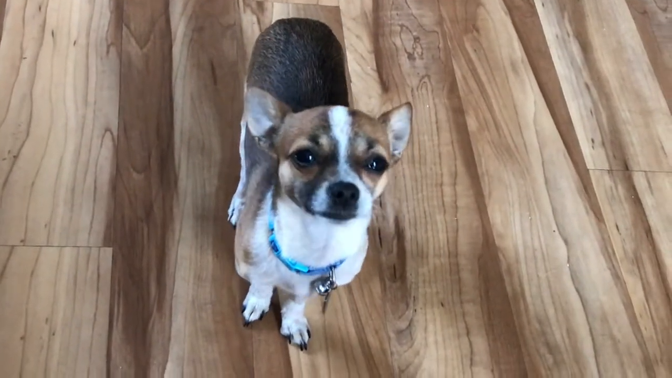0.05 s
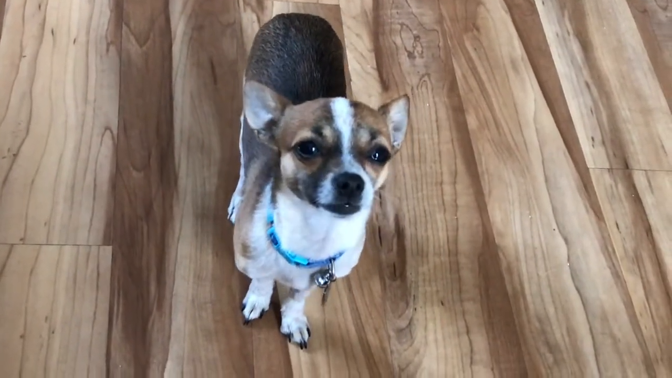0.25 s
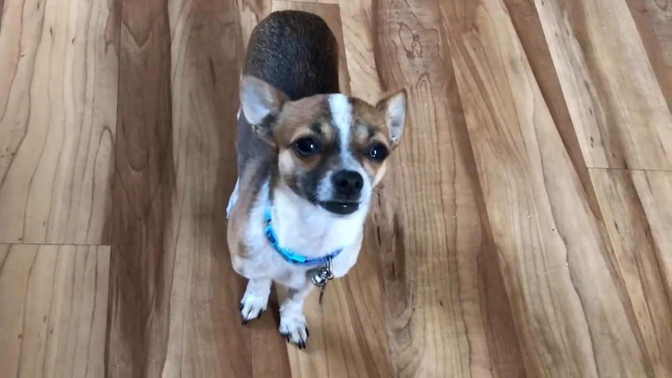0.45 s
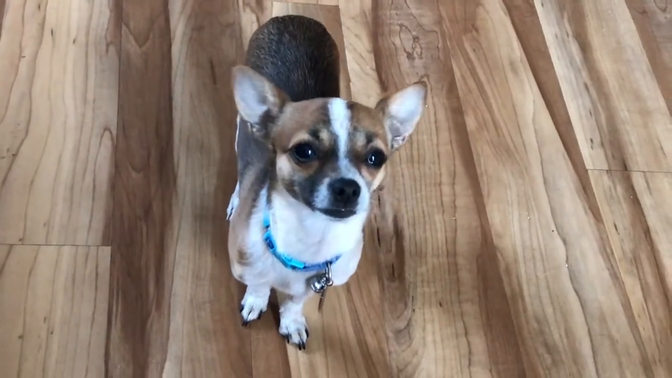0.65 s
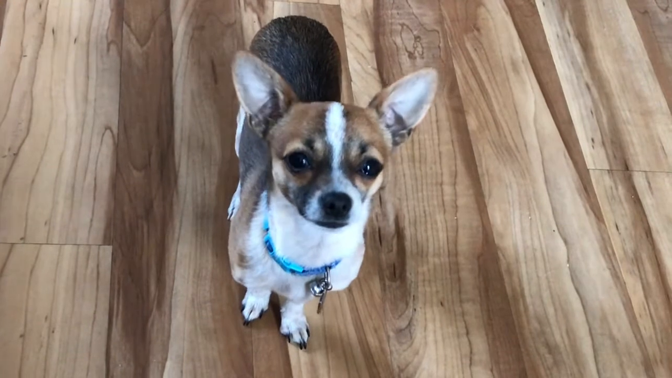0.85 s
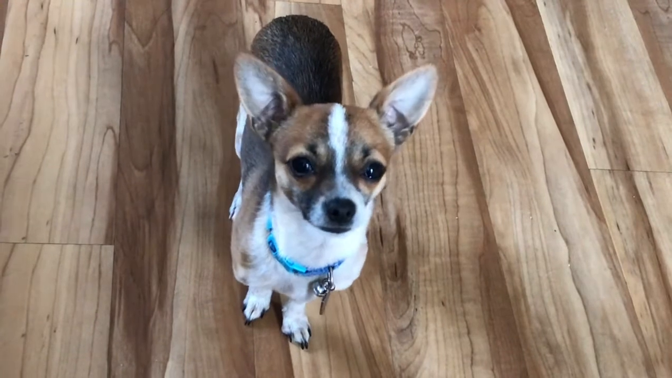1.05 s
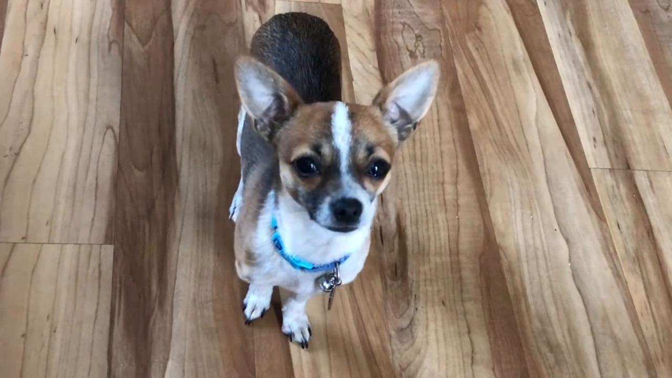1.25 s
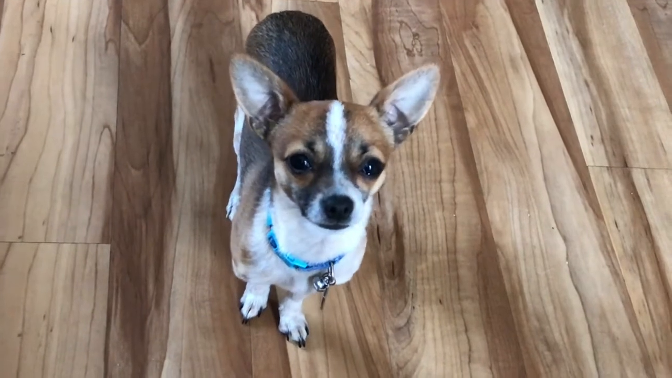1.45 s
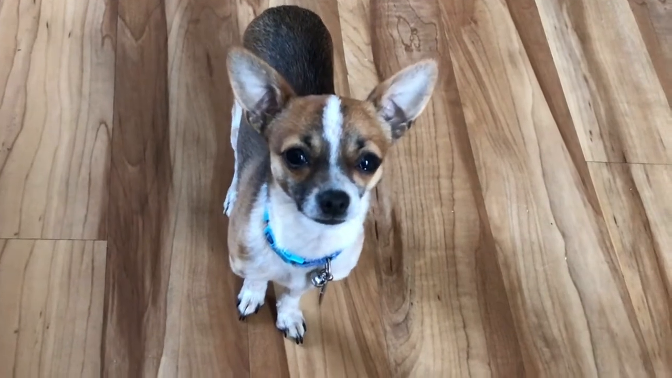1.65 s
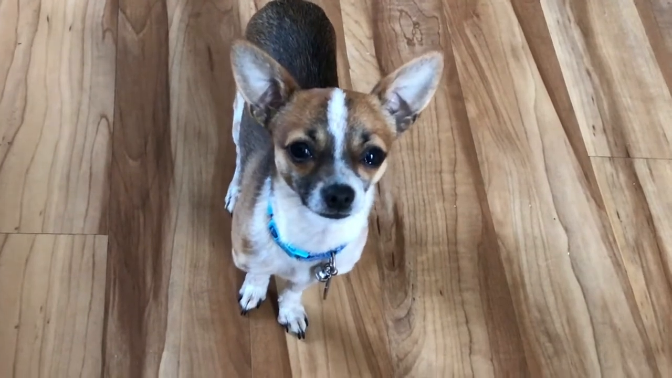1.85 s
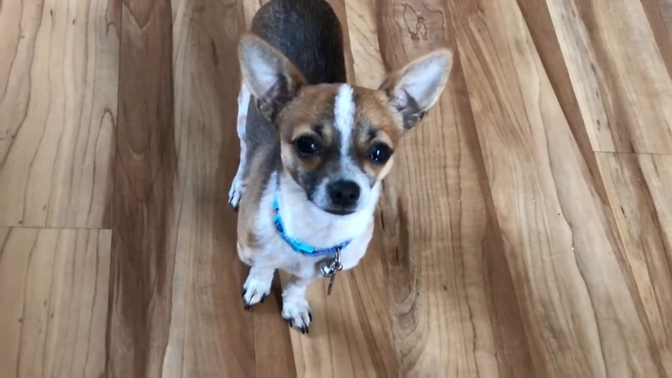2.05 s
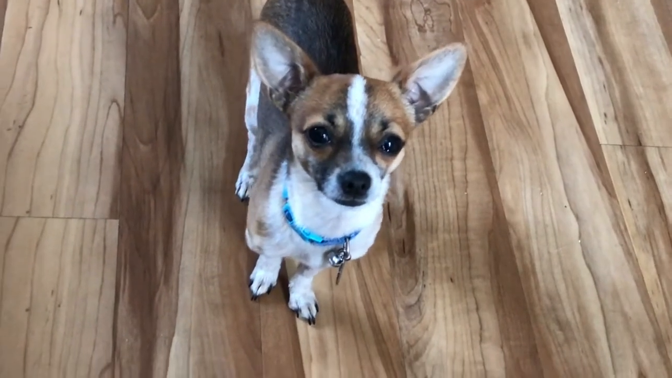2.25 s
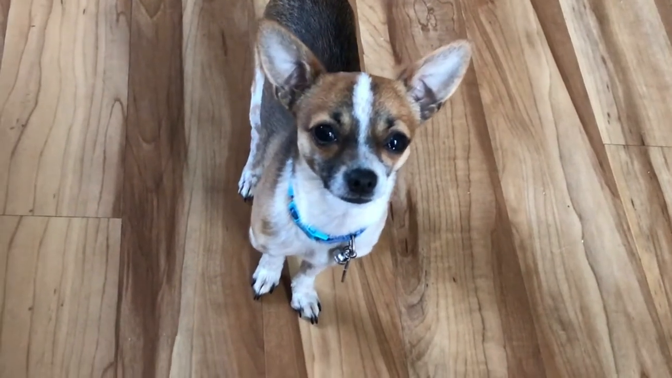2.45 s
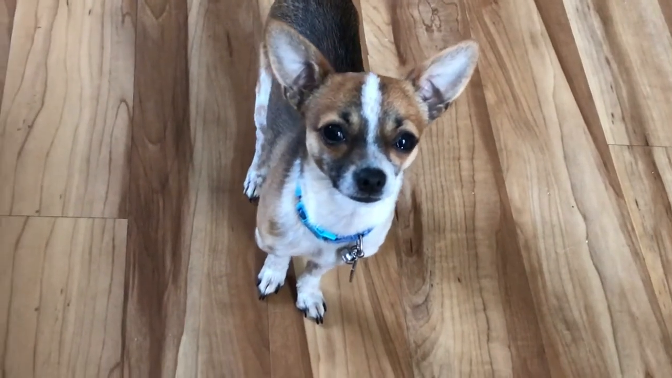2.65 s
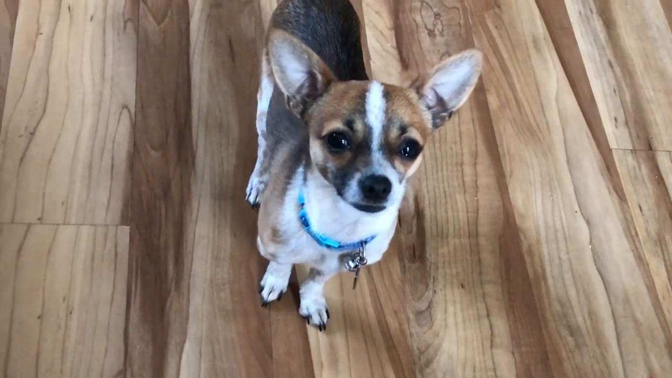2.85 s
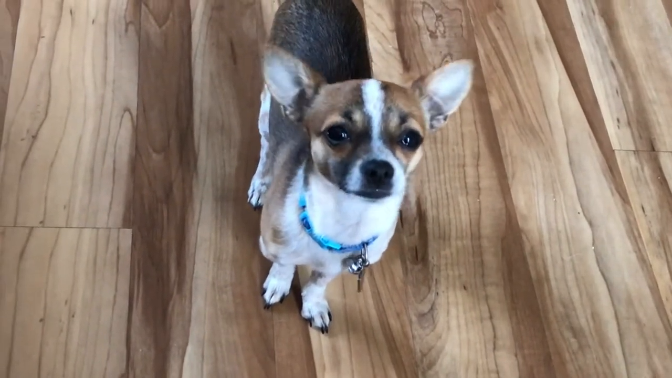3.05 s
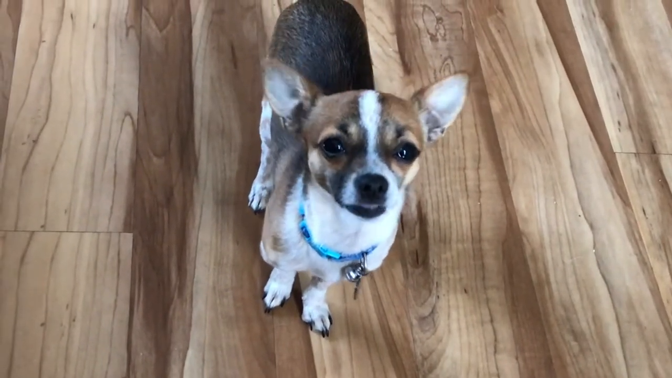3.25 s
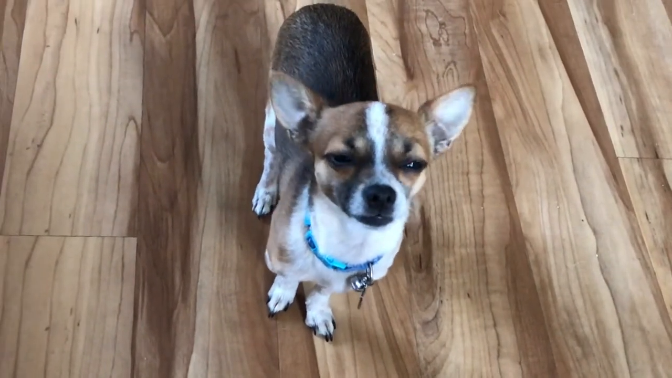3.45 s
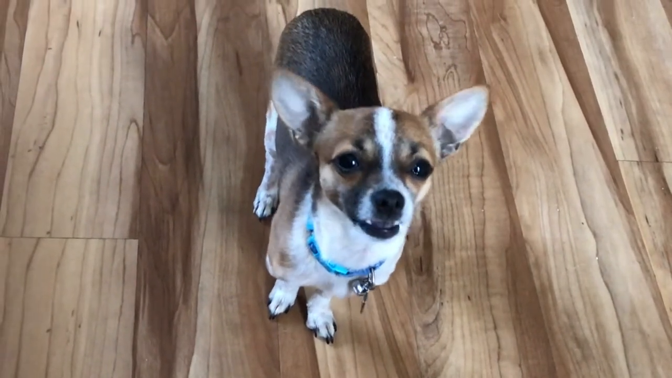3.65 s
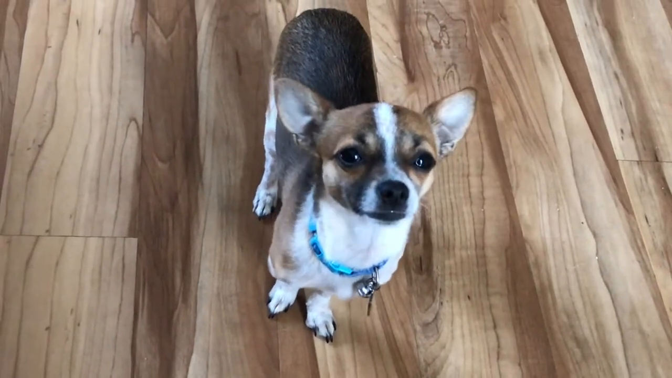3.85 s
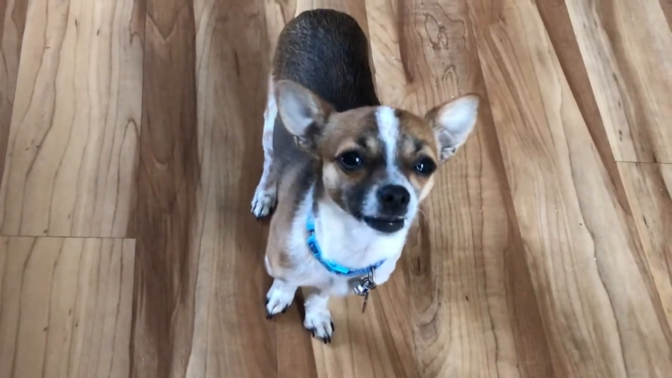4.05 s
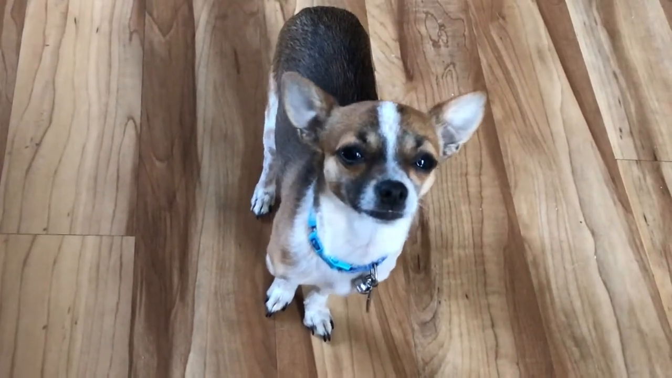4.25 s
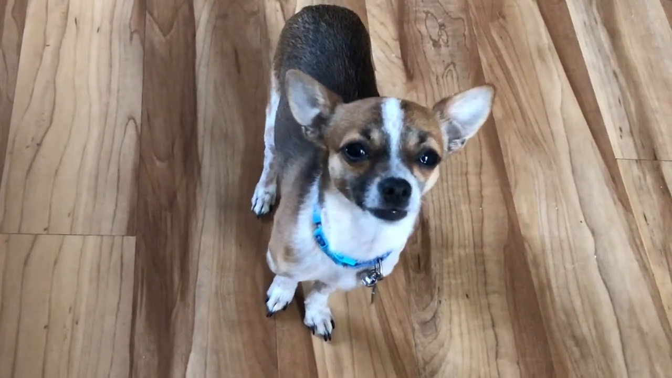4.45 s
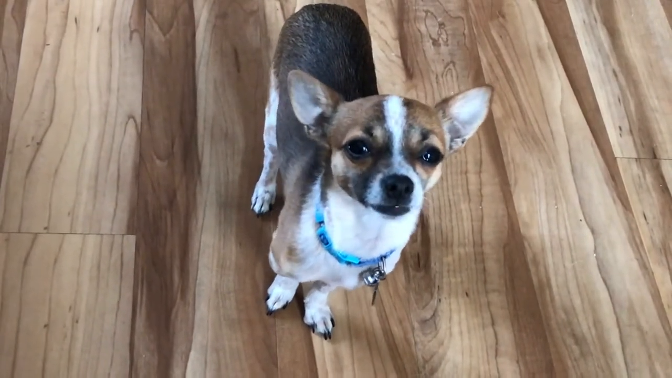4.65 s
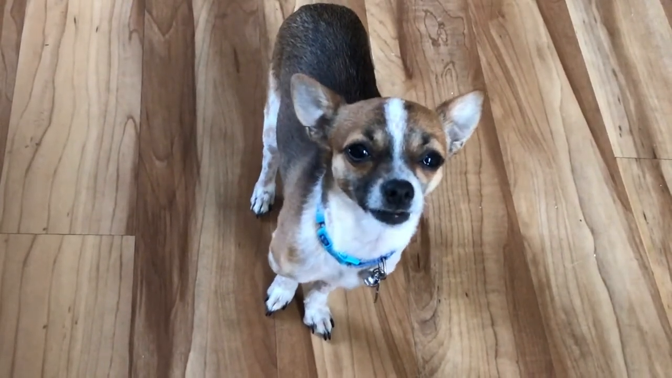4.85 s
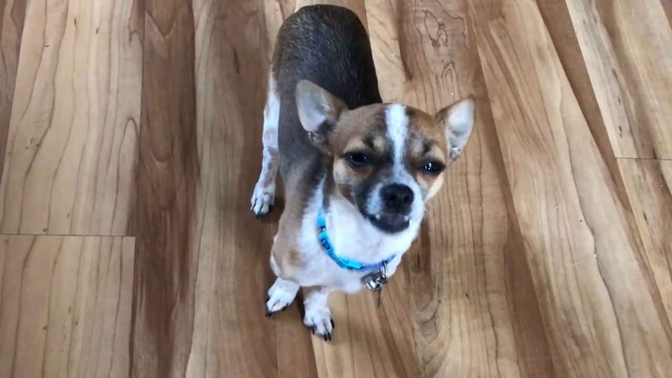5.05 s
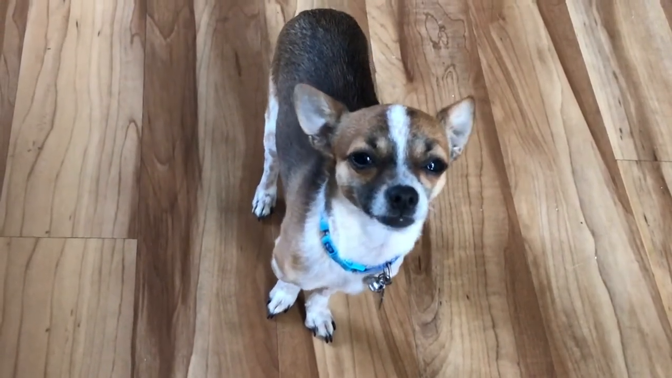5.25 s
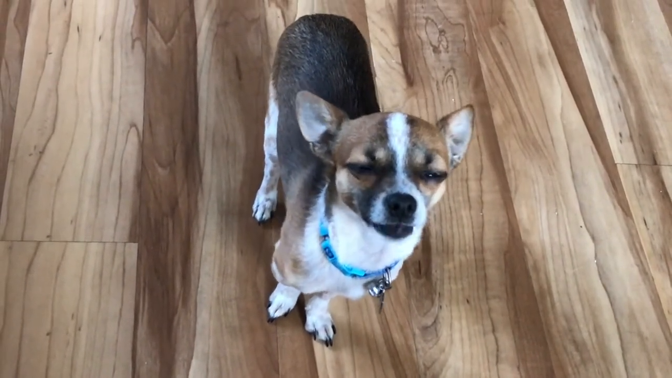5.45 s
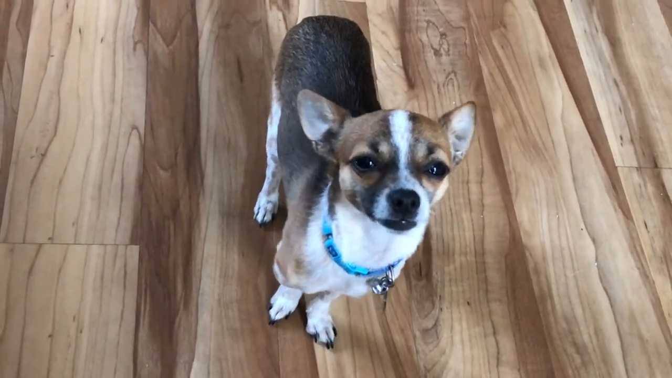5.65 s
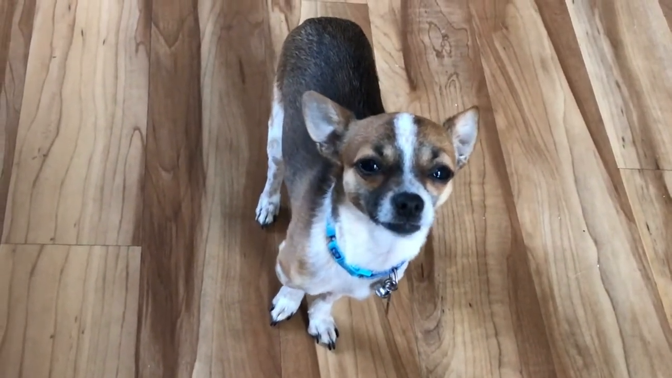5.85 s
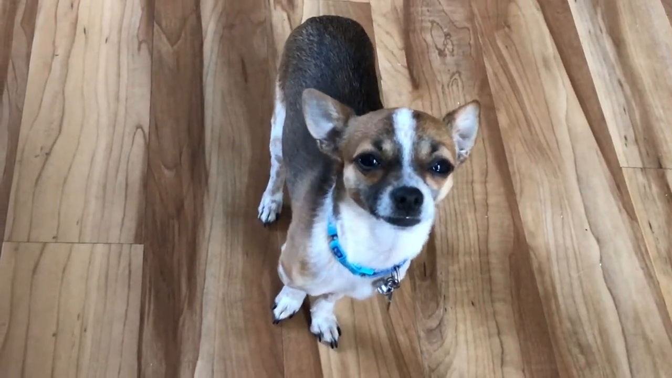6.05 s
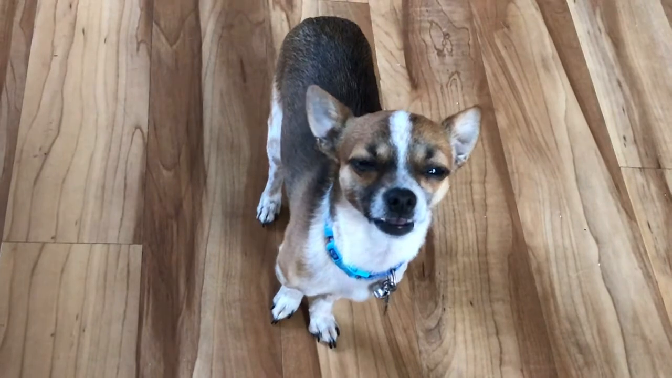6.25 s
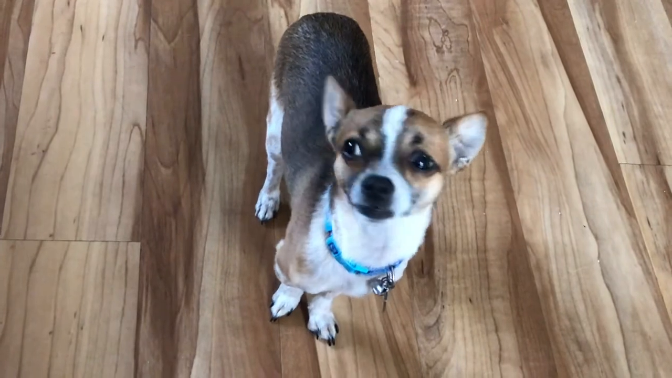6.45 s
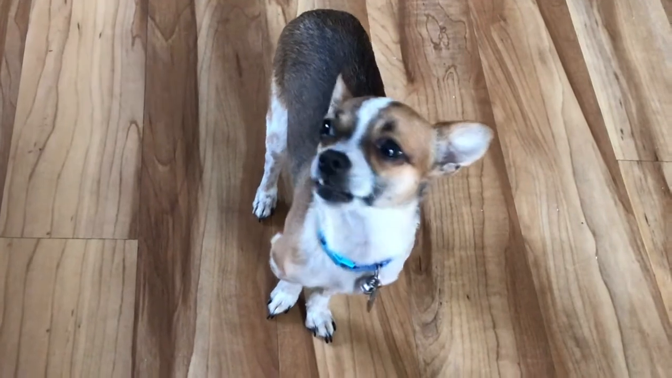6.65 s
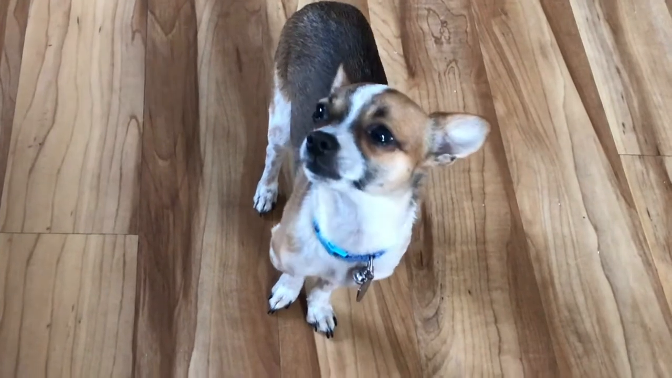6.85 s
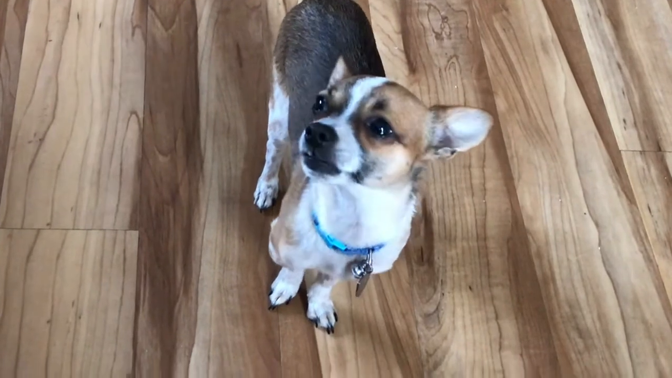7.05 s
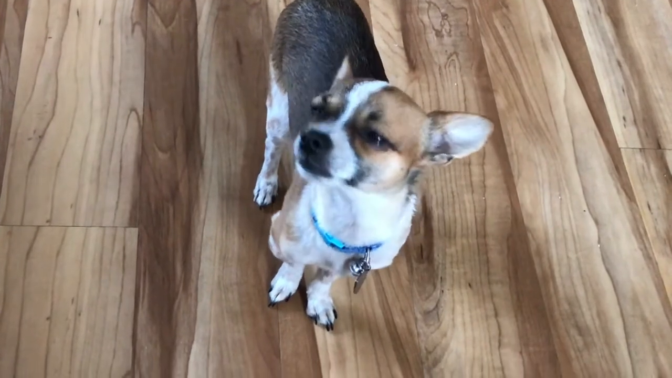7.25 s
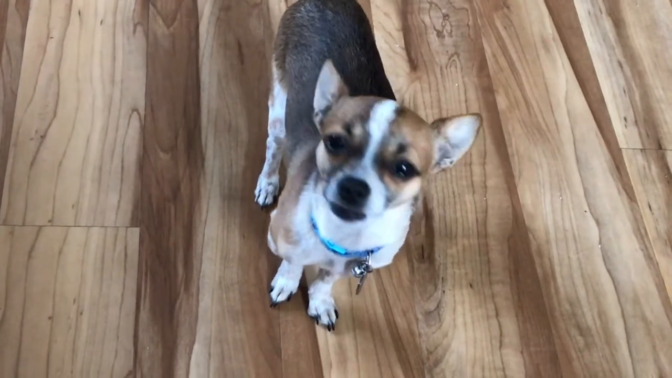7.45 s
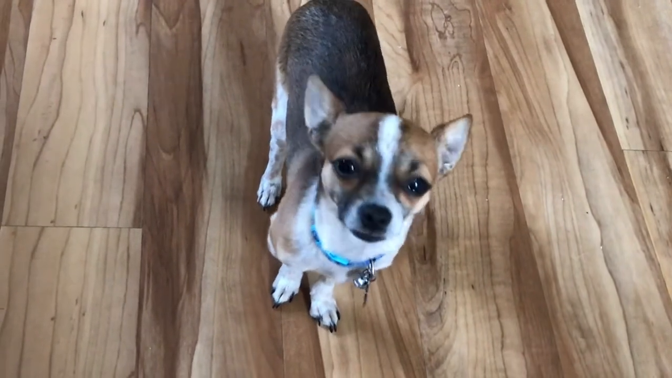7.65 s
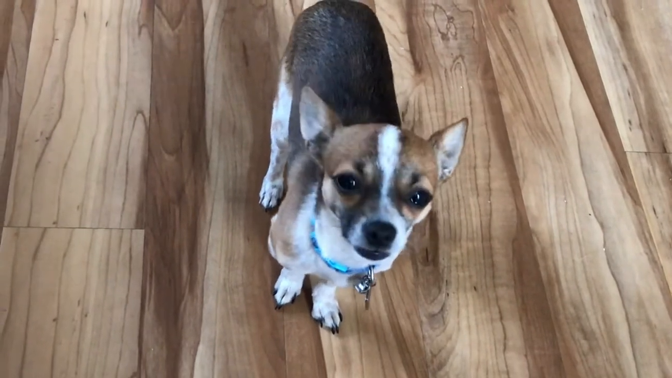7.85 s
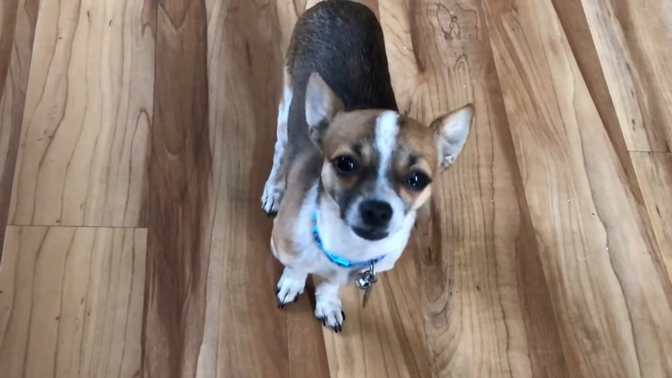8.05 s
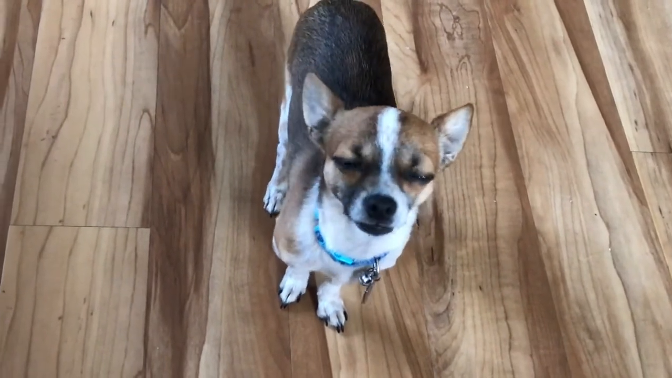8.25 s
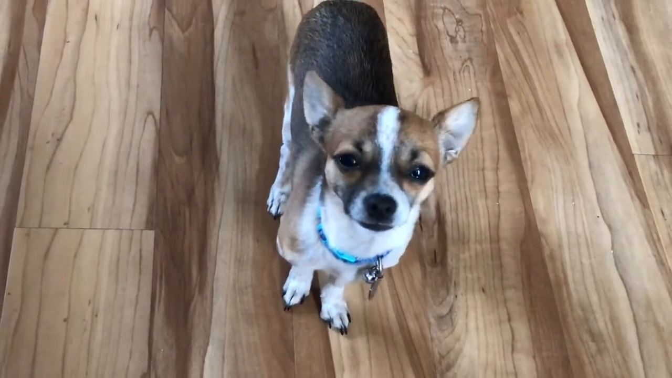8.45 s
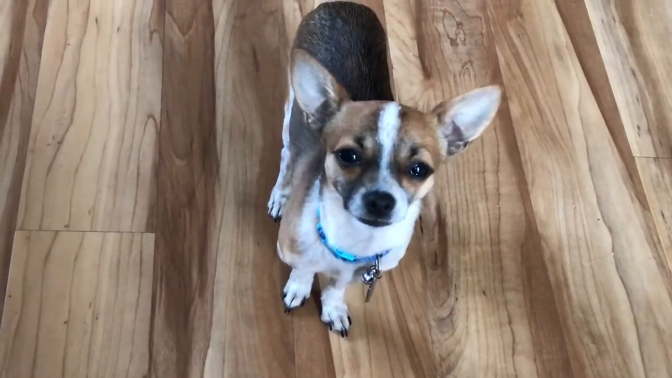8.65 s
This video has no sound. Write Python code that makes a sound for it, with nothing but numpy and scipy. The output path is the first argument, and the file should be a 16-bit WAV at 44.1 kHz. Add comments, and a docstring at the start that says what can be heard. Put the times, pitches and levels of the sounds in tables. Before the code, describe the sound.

A small dog near the microphone grumbles softly through closed lips, the pulses slowing to a creak, just after a yip has rung out. Quiet hum and a thin whine fill the room. Around three seconds a strained, cracking yip starts a regular series of very short, bright yips, each ringing off bare walls, with airy gasps between. Later ones get weaker, ending in tiny squeaks, breaths and light ticks.

```python
"""The ring of a yip just ended hangs in a quiet, hard-walled room, over a low household hum and thin whine.
A small dog on a wooden floor, close to a phone microphone, grumbles with its mouth shut, then yips in
a quick run, gasping between calls; small ticks and soft floor thumps fall among them.
Yips are sums of gliding partials with leaking air, the grumble is pulses through throat resonances,
gasps are shaped noise, ticks and thumps are decaying tones, and the house is noise plus unsteady tones."""
import sys
import numpy as np
from scipy import signal
from scipy.fft import rfft, irfft, next_fast_len
from scipy.io import wavfile
from scipy.ndimage import uniform_filter1d, minimum_filter1d, map_coordinates

SR = 44100
rng = np.random.default_rng(int(sys.argv[2]) if len(sys.argv) > 2 else 0)


def put_to_file(sound):
    """Save the sound as 16-bit audio at rate SR, in the file named by the first command-line argument."""
    columns = np.atleast_2d(sound).T  # one column per channel
    safe = np.clip(columns, -1, 1)
    whole_steps = np.round(safe * 32767)
    wavfile.write(sys.argv[1], SR, whole_steps.astype(np.int16))


N = 384111

# Every call and whimper, the first just ended at time zero:
# (start [s], length [s], onset pitch [Hz], lowest pitch [Hz], top pitch [Hz],
#  middle of the climb [share of call], length of the climb [share of call],
#  first partial [dB], swell over the call [dB], arch of mid-call over both ends [dB],
#  mouth widest [share of call], then with the mouth widest: partials 2, 3, 4 [dB each],
#  higher partials [dB], leaking air [dB])
CALLS = [(-.07, .065, 1401, 1296, 1601, 0.43, .25, -12, 2.5, -1, 0.43, -26.5, -25, -35.5, -40, -36.5),
         (2.946, .078, 1142, 1164, 1547, 0.098, .08, -9, -5, 6, 0.43, -22.5, -27, -31.5, -40, -32.5),
         (3.199, .079, 1369, 1363, 1413, .35, .1, -12, -2, 11, .6, -30.5, -36.5, -44, -41.5, -53),
         (3.714, .063, 1427, 1149, 1557, 0.54, .11, -14.5, -2, -0.5, 0.39, -28, -28, -34, -43, -41.5),
         (4.146, 0.058, 1417, 1143, 1509, 0.61, .08, -15, 0, -0.5, 0.44, -30, -28, -32, -46, -43),
         (4.553, .061, 1344, 1160, 1386, 0.39, .15, -14, -7, 3, .35, -31, -35, -52.5, -46, -44.5),
         (4.981, .07, 1258, 1269, 1594, .12, .2, -7.5, -6, 7, 0.52, -20.5, -23.5, -34, -35.5, -39.5),
         (5.415, 0.054, 1419, 1254, 1539, .55, .15, -14, -1, 0.5, 0.41, -31.5, -28.5, -33.5, -41, -41.5),
         (5.812, .048, 1324, 1197, 1447, 0.5, .2, -12.5, -3.5, 2, 0.5, -32.5, -26.5, -38.5, -42, -40),
         (6.263, .034, 1397, 1260, 1311, 0.54, 0.074, -12, -4.5, 3.5, 0.34, -33.5, -33.5, -55, -47, -48.5),
         (6.659, 0.03, 1486, 1424, 1459, 0.7, .1, -18, -4.5, 2.5, 0.52, -36.5, -39, -57, -47.5, -48),
         (7.13, 0.03, 970, 930, 978, 0.53, .1, -38, -6, 4.5, 0.23, -53.5, -67.5, -67.5, -77, -74.5),
         (7.545, .057, 1258, 1168, 1238, .6, .2, -14, -8.5, 4.5, 0.42, -37.5, -33.5, -40.5, -52.5, -58.5),
         (7.754, 0.016, 1517, 1427, 1570, .8, .1, -41.5, -7.5, 1.5, .5, -76, -69, -81, -84, -85),
         (7.787, .05, 910, 935, 976, 0.32, .2, -72, 1, 9, 0.61, -60, -84, -80, -88, -82.5),
         (7.865, .036, 1309, 1279, 1355, 0.677, .2, -23.5, -1.5, -0.5, 0.73, -45, -45.5, -63, -67, -62.5),
         (7.925, 0.031, 930, 922, 972, .3, .1, -51.5, 2, 1.5, 1, -61.5, -78, -72, -86, -79.5),
         (8.21, 0.0088, 805, 805, 844, 0.37, .2, -38, -21, 1, 0.27, -67, -68, -86.5, -79, -87),
         (8.212, .028, 1216, 1227, 1273, 0.37, .1, -32, -3, 4, .4, -63.5, -69.5, -78, -70, -72)]
# Colour the open mouth gives higher partials and air: (frequency [Hz], level [dB])
MOUTH_COLOUR = [(1000, 3.5), (4500, 6.5), (5700, -6), (6400, -16.5), (7100, -8), (8500, -11.5),
                (10000, -17), (12500, -15), (16000, -18.5)]
# Extra lines of a broken voice: (frequency [fifths of the pitch], level against partial 1 [dB])
BROKEN_LINES = [(2, -21), (3, -31.5), (6, -11.5), (12, -20.5), (18, -10.5)]
# Loss half a call before and after the widest mouth: (partial 2, 3, 4, higher partials, air [dB each])
OPENING_LOSS = [-4, -8, -16, -9, -3]
CLOSING_LOSS = [-4.5, -12.5, -19, -8.5, -5.5]
# Walls of the room: (frequency [Hz], time to die by 60 dB [s])
ROOM_DECAY = [(100, 0.23), (1300, 0.67), (3000, 0.69), (4500, 0.55), (6000, 0.51), (12000, 0.25)]
# Spectrum of the household hum: (frequency [Hz], relative level per Hz [dB])
HUM_SPECTRUM = [(18, -45), (30, -12), (114, -6.5), (173, -4), (293, -4.5), (370, -13.5), (677, -14.5),
                (792, -16), (1200, -19), (2780, -29), (4460, -28.5), (4820, -30), (15700, -40)]
# Appliances: (frequency [Hz], rms level before sway [dB], unsteadiness [dB])
APPLIANCE_TONES = [(64.4, -73, 2), (140, -79, 3.5), (215, -73.5, 5.5), (4336, -79.5, 4.8)]
# Course of the grumble: (time [s], pulses a second [Hz], level [dB])
GRUMBLE_COURSE = [(.23, 103, -51.5), (.32, 88, -47.5), (.48, 108, -45.5), (.56, 149, -44),
                  (.69, 135, -46.5), (.75, 122, -45), (.9, 105, -48.5), (1.03, 78, -49), (1.12, 76, -48),
                  (1.2, 68, -49), (1.249, 55, -52.5), (1.451, 50, -52.5), (1.58, 42, -62), (1.721, 41, -68)]
# Throat resonances behind the shut mouth: (frequency [Hz], width [Hz], level [dB])
THROAT_MODES = [(154, 62, -8), (304, 99, 0.5), (370, 120, -1), (570, 240, -16.5), (1130, 160, -17)]
# Gasps and pants: (time [s], length [s], airway level before swell [dB], nostril hiss before swell [dB])
BREATHS = [(0.297, 0.29, -65, -79), (0.588, 0.05, -61.5, -80), (1.118, 0.63, -75.5, -79.5),
           (2.226, 0.17, -93.5, -85), (2.799, 0.11, -75, -84), (2.84, 0.047, -64.5, -64),
           (2.865, 0.02, -68, -89), (3.582, .06, -54.5, -68), (4.017, 0.069, -53, -64.5),
           (4.41, .055, -74, -66.5), (4.869, .045, -55, -64.5), (5.285, 0.038, -58.5, -66.5),
           (5.66, 0.072, -66, -71.5), (6.1, 0.087, -69, -73.5), (6.498, 0.041, -56.5, -71),
           (7.046, 0.1, -61, -98), (7.408, 0.05, -62, -76), (7.773, 0.22, -65.5, -76),
           (8.07, 0.076, -70.5, -78), (8.204, 0.12, -59, -66.5), (8.361, 0.17, -70.5, -75.5),
           (8.48, 0.075, -73, -71.5)]
# Airway resonances: (frequency [Hz], width [Hz], level [dB])
AIRWAY_MODES = [(811, 450, -6), (1220, 110, -1), (1960, 480, -1), (3600, 1300, 3.5), (3944, 960, 5.5),
                (6700, 1400, -10)]
# Nostril resonances: (frequency [Hz], width [Hz], level [dB])
NOSTRIL_MODES = [(6600, 720, 0.5), (8383, 280, -1), (10700, 3900, -2), (14050, 1200, -10.5)]
# Small ticks of lips and claws: (time [s], peak level [dB], pitch [Hz])
TICK_HITS = [(.834, -41, 1300), (2.728, -60.5, 13020), (6.489, -39.5, 8500), (6.618, -51, 3010),
             (7.37, -62, 9000), (8.061, -71, 6050), (8.478, -48.5, 11500)]
# Soft thumps in the floor: (time [s], level before swell and decay [dB], pitch [Hz])
FLOOR_THUMPS = [(1.643, -39.5, 137), (2.006, -38, 147), (2.865, -40.5, 129), (3.739, -37, 128),
                (6.377, -39.5, 145), (7.705, -45, 126.7)]

LEAD = SR // 10  # samples kept before time zero
TOP_HZ = 15800  # band limit of the phone
LIMIT = .68  # limiter ceiling, full scale = 1
HUM_DB = -61.5

DROP_S = 0.0043  # time for the pitch to leave its onset for its lowest
KICK_DB_PER_HZ = 0.012  # the further the pitch drops at the onset, the harder the folds caught
RING_HZ, RING_WIDTH_HZ = 1463, 450  # the mouth rings: the first partial is loudest at that pitch
# roughness (0 to 1) of a held call, added at the onset, and how soon that settles
CALM, CATCH, CATCH_S = .02, .25, .004
# the first bark after the grumble is strained until the voice breaks; the first partial weakens meanwhile
BREAK_S, BREAK_LENGTH_S, BREAK_EDGE_S, BREAK_DB = 2.977, .036, 0.0011, -4
STRAINING, STRAINING_S = .35, .03  # roughness reached just before the break, and how long it grows
STEADY, CREAKY, CREAK_RATE = .025, .18, 62  # irregularity above and below that many pulses a second


def amp(db):
    """Decibels to gain."""
    return 10 ** (np.asarray(db) / 20)


def unit(x):
    """Scaled to rms 1."""
    return x / np.sqrt(np.mean(x ** 2) + 1e-20)


def along(points, hz):
    """Interpolates (Hz, value) points on a log frequency axis."""
    f, v = np.transpose(points)
    return np.interp(np.log(hz + 1), np.log(f + 1), v)


def wobble(size, rate):
    """A smooth random curve, rate knots a second."""
    knots = rng.standard_normal(int(size * rate / SR) + 4)
    return map_coordinates(knots, [np.arange(size) * rate / SR])


def filtered(x, response):
    """x passed through a complex response of frequency."""
    m = next_fast_len(len(x) + SR // 4)
    spectrum = rfft(x, m) * response(np.fft.rfftfreq(m, 1 / SR))
    return irfft(spectrum, m)[:len(x)]


def resonances(modes):
    """The causal response of (Hz, width, dB) resonances, alternating in sign."""
    def response(f):
        return sum((-1) ** k * amp(db) * 1j * f * width / (hz * hz - f * f + 1j * f * width)
                   for k, (hz, width, db) in enumerate(modes))
    return response


def add(track, s, x):
    """Mixes x in at s seconds; the track begins a little before time zero."""
    part = track[LEAD + round(s * SR):][:len(x)]
    part += x[:len(part)]


def in_room(x, wet_db):
    """The sound and the walls' answer, noise whose every frequency dies at its own speed."""
    hz, t, noise = signal.stft(rng.standard_normal(SR), SR, nperseg=256)
    build = 1 - np.exp(-t / 0.003)  # the first walls are metres away
    decay = amp(-60 * t / along(ROOM_DECAY, hz)[:, None])
    tail = signal.istft(noise * build * decay, SR, nperseg=256)[1]
    out = amp(wet_db) * signal.fftconvolve(x, tail / np.linalg.norm(tail))
    out[:len(x)] += x
    return out


def gesture(start, length, onset_hz, low_hz, top_hz, climb_at, climb,
            level_db, swell_db, arch_db, widest, *open_db):
    """Folds and mouth over one call: times, pitch, partials 1 to 4, higher partials, air, roughness."""
    t = np.arange(start - .01, start + length + .005, 1 / SR)
    since = np.clip(t - start, 0, length)
    share = since / length
    rise = .5 + .5 * np.tanh((share - climb_at) / (2 * max(climb, .02)))
    drop_hz = (onset_hz - low_hz) * np.exp(-(since / DROP_S) ** 2)
    hz = low_hz + (top_hz - low_hz) * rise + drop_hz

    inside_break = np.minimum(t - BREAK_S, BREAK_S + BREAK_LENGTH_S - t)
    strain = np.clip(inside_break / BREAK_EDGE_S, 0, 1)
    straining = STRAINING * np.clip(1 + (t - BREAK_S) / STRAINING_S, 0, 1)
    straining *= t < BREAK_S + BREAK_EDGE_S
    rough = np.clip(CALM + CATCH * np.exp(-since / CATCH_S) + strain + straining, 0, 1)

    ring_db = -10 * np.log10(1 + (2 * (hz - RING_HZ) / RING_WIDTH_HZ) ** 2)
    shape_db = swell_db * (share - .5) - arch_db * (2 * share - 1) ** 2
    first_db = level_db + shape_db + ring_db + KICK_DB_PER_HZ * drop_hz + BREAK_DB * strain
    shut = (2 * (share - widest)) ** 2
    *lows_db, high_db, air_db = [db + shut * np.where(share < widest, early_db, late_db)
                                 for db, early_db, late_db in zip(open_db, OPENING_LOSS, CLOSING_LOSS)]
    return t, hz, [first_db, *lows_db], high_db, air_db, rough


def yip(row):
    """Vocal folds at a whistling pitch: a near-pure first partial, mouth-set overtones, air leaking past."""
    t, hz, lows_db, high_db, air_db, rough = gesture(*row)
    size = len(t)
    steady = 2 * np.pi * np.cumsum(hz) / SR
    # unsteady folds smear the upper partials most
    turn = steady + (.07 + .3 * rough) * wobble(size, 500)

    flicker_db = [1, 3, 3.5, 4.5]  # for partials 1 to 4
    low = sum(amp(db + flicker_db[k - 1] * wobble(size, 160)) * np.sin(k * turn + k)
              for k, db in enumerate(lows_db, 1))

    order = np.arange(5, 14)[:, None]
    uneven_db = rng.normal(0, 4, order.shape)
    high_flicker_db = 4 * np.array([wobble(size, 110) for _ in order])
    sizes = amp(along(MOUTH_COLOUR, order * hz) + uneven_db + high_flicker_db)
    in_band = order * hz < TOP_HZ
    high = (sizes * in_band * np.sin(order * turn + order ** 2)).sum(0)

    def hiss(f):  # leaking air hisses high
        return amp(along(MOUTH_COLOUR, f)) * f ** 2 / (f ** 2 + 3500 ** 2)
    air = unit(filtered(rng.standard_normal(size), hiss))

    # strained folds slap harder every fifth cycle
    fifth = steady / 5
    rattle = np.exp(0.55 * rough * (np.cos(fifth + 1.2 * wobble(size, 200)) - .4))
    tonal = np.sqrt(2) * (low + amp(high_db) * high)
    voice = rattle * (tonal + amp(air_db + 9 * rough) * air)

    # past half strain the voice splits into extra lines
    broken = np.clip(2 * rough - 1, 0, 1) * amp(lows_db[0])
    voice += broken * sum(amp(db) * np.sin(k * (fifth + 0.016 * wobble(size, 300)))
                          for k, db in BROKEN_LINES)

    # the folds start faintly, then catch; they stop within a few cycles
    onset = np.interp(t - row[0], [-.01, -.002, .004], [0, .06, 1])
    voice *= onset * np.clip((t[-1] - t) / 0.0049, 0, 1)
    # a small mouth radiates no bass
    return t[0], filtered(voice, lambda f: f ** 4 / (f ** 4 + 480 ** 4))


def yips():
    """Every call rings out between the hard walls."""
    out = np.zeros(LEAD + N)
    for row in CALLS:
        s, voice = yip(row)
        add(out, s, in_room(voice, wet_db=-13.5))
    return out


def house():
    """Drifting hum from shaped noise, with a few tones unsteady in level and phase."""
    size = LEAD + N
    t = np.arange(size) / SR

    def colour(f):
        return amp(along(HUM_SPECTRUM, f)) * f ** 2 / (f ** 2 + 25 ** 2)
    hum = unit(filtered(rng.standard_normal(size), colour))
    drift_db = .6 * wobble(size, 3)
    out = amp(HUM_DB + drift_db) * hum
    for hz, db, sway_db in APPLIANCE_TONES:
        level = np.sqrt(2) * amp(db + sway_db * wobble(size, 12))
        out += level * np.sin(2 * np.pi * hz * t + 0.71 * wobble(size, 15))
    return out


def grumble():
    """Slow throat pulses behind shut lips; regular at first, then creaking apart."""
    s, *cols = np.transpose(GRUMBLE_COURSE)
    t = np.arange(s[0], s[-1], 1 / SR)
    rate, level_db = [np.interp(t, s, c) for c in cols]
    loose = np.where(rate > CREAK_RATE, STEADY, CREAKY)
    uneven_rate = rate * amp(8.8 * loose * wobble(len(t), 45))
    # one pulse each time the running count passes a whole number
    beats = np.flatnonzero(np.diff(np.floor(np.cumsum(uneven_rate) / SR)))
    pulses = np.zeros(len(t))
    strength_db = (1.2 + 8 * loose[beats]) * rng.standard_normal(len(beats))
    pulses[beats] = amp(strength_db) / np.sqrt(rate[beats])

    def throat(f):
        return resonances(THROAT_MODES)(f) / (1 + 1j * f / 500) ** 2
    voice = unit(filtered(pulses, throat)) * amp(level_db)
    out = np.zeros(LEAD + N)
    add(out, s[0], in_room(voice, wet_db=-6))
    return out


def breath_noise(size, modes):
    """Rushing air: noise through the power response of the resonances, at rms 1."""
    return unit(filtered(rng.standard_normal(size), lambda f: abs(resonances(modes)(f)) ** 2))


def gasps():
    """Air rushing through the airway and hissing in the nostrils; a gasp starts and stops abruptly."""
    out = np.zeros(LEAD + N)
    for s, length, db, hiss_db in BREATHS:
        size = round(length * SR)
        swell = np.sin(np.linspace(0, np.pi, size)) ** .5 * amp(2.5 * wobble(size, 60))
        rush = amp(db) * breath_noise(size, AIRWAY_MODES)
        hiss = amp(hiss_db) * breath_noise(size, NOSTRIL_MODES)
        add(out, s, in_room(swell * (rush + hiss), wet_db=-8.0))
    return out


def ticks():
    """Light contacts start at their peak and lose 20 dB a cycle."""
    out, t = np.zeros(LEAD + N), np.arange(SR // 8) / SR
    for s, db, hz in TICK_HITS:
        add(out, s, amp(db - 20 * t * hz) * np.cos(2 * np.pi * hz * t))
    return out


def thumps():
    """The floor swells softly and rings a little, dying by 60 dB in 71 ms."""
    out, t = np.zeros(LEAD + N), np.arange(SR // 8) / SR
    swell = 1 - np.exp(-t / 0.0044)
    for s, db, hz in FLOOR_THUMPS:
        level = amp(db + 0.5 - 60 * t / 0.071)
        add(out, s, level * swell * np.sin(2 * np.pi * hz * t))
    return out


def scene():
    """All sources, from time zero on."""
    mix = yips() + house() + grumble() + gasps() + ticks() + thumps()
    return mix[None, LEAD:]


def record(dry):
    """A limiter holds the loudest yips; the phone keeps nothing above its band limit."""
    span = SR // 200  # 5 ms
    needed = np.minimum(1, LIMIT / (abs(dry[0]) + 1e-9))
    held = minimum_filter1d(needed, size=2 * span)
    gain = uniform_filter1d(held, size=span)
    return filtered(dry[0] * gain, lambda hz: hz < TOP_HZ)[None]


dry = scene()
out = record(dry)
put_to_file(out)
```